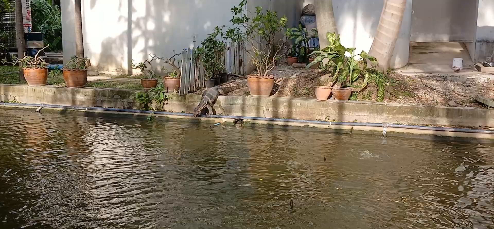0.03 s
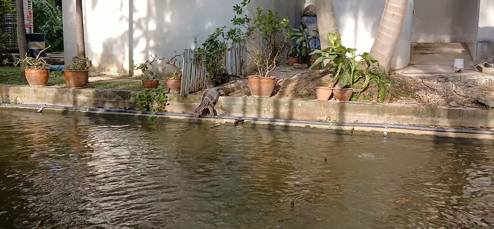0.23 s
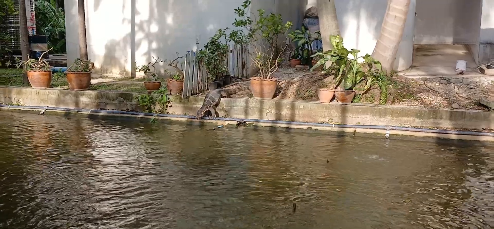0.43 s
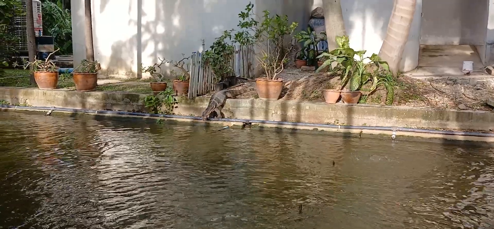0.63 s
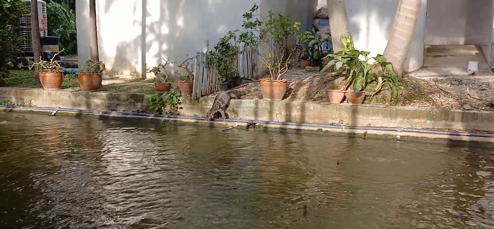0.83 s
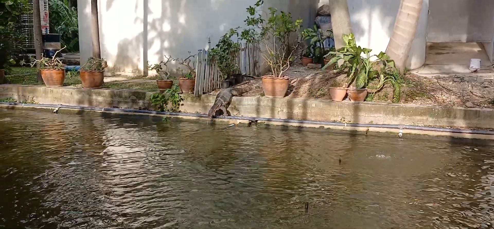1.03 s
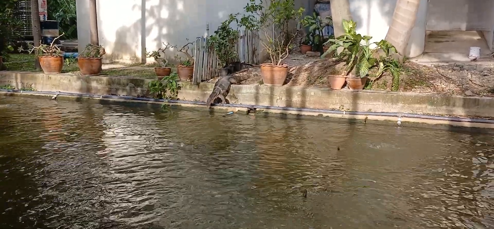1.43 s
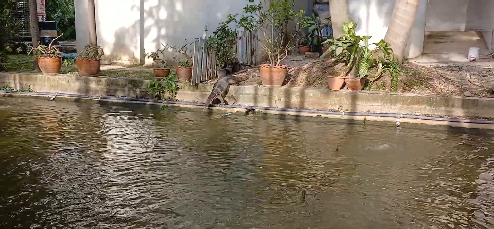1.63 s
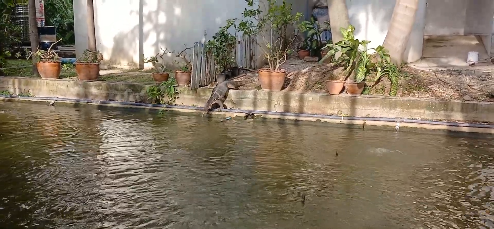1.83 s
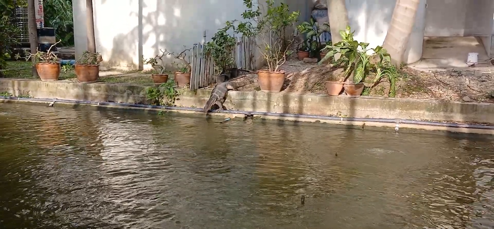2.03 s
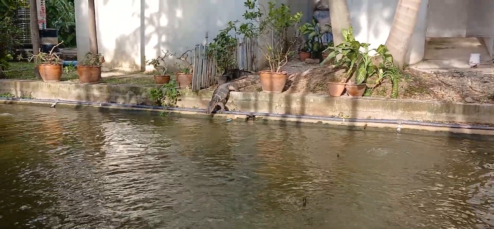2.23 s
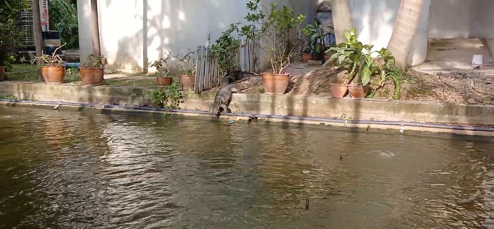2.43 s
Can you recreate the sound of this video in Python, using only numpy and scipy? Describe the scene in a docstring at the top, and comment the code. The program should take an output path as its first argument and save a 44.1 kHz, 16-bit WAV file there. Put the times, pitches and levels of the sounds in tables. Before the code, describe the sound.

Wind hits the microphone in low, uneven gusts with dull pops, then dies down. Far traffic and an airy hiss continue underneath, while faint birds whistle and small, quiet splashes come off an outdoor pond.

```python
"""Beside a park pond, on a small two-port microphone out in the wind.
Just after the start the sound cuts in with a soft bump, over far traffic and a steady airy hiss.
At once gusts rumble at each port on its own, and single eddies thump against one port or the other.
From about 0.4 s a few faint birds whistle in the background, echoed by walls and trees.
From about 0.8 s small splashes come off the pond; after two seconds the wind dies down."""
import sys
import numpy as np
from scipy import signal
from scipy.fft import rfft, irfft
from scipy.io import wavfile
from scipy.ndimage import uniform_filter1d

SR = 44100
rng = np.random.default_rng(int(sys.argv[2]) if len(sys.argv) > 2 else 0)


def file_out(sig):
    """Save sig as 16-bit WAV at sys.argv[1]."""
    # one column per channel
    cols = np.atleast_2d(sig).T
    # limit, then scale
    lim = np.clip(cols, -1, 1)
    pcm = np.round(lim * 32767).astype(np.int16)
    wavfile.write(sys.argv[1], SR, pcm)


N = 110250
T = np.arange(N) / SR
FREQS = np.maximum(np.arange(N // 2 + 1) * SR / N, 1)
START_S = 0.067


def from_db(db):
    """Decibels to gain."""
    return 10 ** (np.asarray(db) / 20)


def rms_one(x):
    """Scale to rms 1."""
    return x / np.sqrt(np.mean(x ** 2) + 1e-20)


def in_time(rows):
    """A curve of (seconds, value) rows at every sample."""
    return np.interp(T, *np.transpose(rows))


def butter(x, hz, kind, order=2):
    """Causal low-, high- or band-pass."""
    return signal.sosfilt(signal.butter(order, hz, kind, fs=SR, output="sos"), x + 1e-18)


def drift(rate_hz):
    """Random wander of rms 1, mostly slower than the rate."""
    return rms_one(irfft(rfft(rng.standard_normal(N)) / (1 + (FREQS / rate_hz) ** 2), N))


def coloured(spectrum):
    """Two unrelated noises with one spectrum, or with one for each side."""
    hz, *columns = np.transpose(spectrum)
    db = np.array([np.interp(np.log(FREQS), np.log(hz), c) for c in columns])
    skirts = np.minimum(FREQS / hz[0], 1) ** 2 * np.minimum(hz[-1] / FREQS, 1) ** 4
    return rms_one(irfft(rfft(rng.standard_normal((2, N))) * from_db(db) * skirts, N))


def panned(x, pan_db):
    """Share a sound between left and right at constant power."""
    gains = from_db(np.array([[.5], [-.5]]) * pan_db)
    return x * gains / np.sqrt(np.mean(gains ** 2, axis=0))


def opening_bump(level_db=-29.5, low_hz=209, top_hz=1130, spread_s=0.013):
    """A soft, dull bump on both sides as the sound cuts in."""
    puff = butter(rng.standard_normal((2, N)), [low_hz, top_hz], "band", order=3)
    puff = rms_one(butter(puff, low_hz, "low", order=1))
    swell = np.exp(-((T - START_S - spread_s) / spread_s) ** 2)
    return from_db(level_db) * puff * swell


# Traffic heard from far off. Each row: frequency in Hz, relative spectral level in dB.
TRAFFIC_SPECTRUM = [(25, -26), (60, -3.5), (95, -20), (128, 3), (180, -14), (270, -10), (400, -20.5),
                    (640, -18), (790, -22), (980, -21.5), (1350, -34), (2500, -37)]


def far_traffic(level_db=-35, lag_s=0.00029):
    """A far, even drone that reaches the left port a little earlier."""
    left = coloured(TRAFFIC_SPECTRUM)[0]
    right = np.interp(T - lag_s, T, left)
    return from_db(level_db) * rms_one(np.array([left, right]))


# The open air of the park. Each row: frequency in Hz, left and right relative spectral levels in dB.
HISS_SPECTRUM = [(463, 3, 4.5), (1120, -0.5, -6), (1470, 3.5, 0.5), (2240, 2, 2), (3050, -6.5, -3),
                 (4400, -14, -1.5), (5850, -11.5, -6.5), (7240, -14.5, -2.5), (8660, -11, -8.5),
                 (12000, -10, -9), (15800, -16.5, -14.5)]
# The slow course of that hiss. Each row: time in seconds, base level in dB.
HISS_LEVELS = [(0, -46), (.9, -50.5), (1.7, -49), (2.3, -48.5), (2.5, -50)]


def airy_hiss(treble_hz=7000, flicker_db=0.69):
    """Smooth hiss of the open air, brighter on the right; its top opens up in the first second."""
    air = coloured(HISS_SPECTRUM)
    treble = irfft(rfft(air) / (1 + (treble_hz / FREQS) ** 4), N)
    treble_db = np.interp(T, [.1, 1], [-4, 0])
    air = air - treble + treble * from_db(treble_db)
    return air * from_db(in_time(HISS_LEVELS) + flicker_db * drift(rate_hz=44))


# Gusts at the left and at the right port. Each row: time in seconds, relative rumble level in dB.
LEFT_GUSTS = [(0.07, -55), (0.19, -21.5), (0.28, -24), (0.36, -40), (0.43, -27), (0.48, -20.5),
              (0.51, -32.5), (0.54, -28), (0.61, -34.5), (0.85, -23.5), (0.95, -46), (1.19, -20),
              (1.22, -66), (1.27, -34.5), (1.45, -32.5), (1.52, -26.5), (1.59, -37.5), (1.63, -22.5),
              (1.71, -41), (1.8, -21.5), (1.92, -26.5), (2.08, -31), (2.13, -35.5), (2.31, -38),
              (2.39, -47), (2.5, -69)]
RIGHT_GUSTS = [(0.07, -36), (0.14, -23.5), (0.22, -21), (0.29, -30), (0.32, -24), (0.36, -28.5),
               (0.42, -21.5), (0.52, -26.5), (0.56, -20), (0.62, -31.5), (0.77, -27.5), (0.8, -31.5),
               (0.98, -26.5), (1.08, -47), (1.18, -34.5), (1.27, -23.5), (1.34, -43), (1.44, -28),
               (1.6, -47), (1.67, -26), (1.71, -45), (1.89, -33), (1.95, -37), (2.18, -37.5), (2.25, -35),
               (2.27, -49), (2.5, -41)]
# Wind right on a port. Each row: frequency in Hz, relative spectral level in dB.
RUMBLE_SPECTRUM = [(22, -54), (35, -16.5), (58, -3.5), (115, 1.5), (165, -3.5), (270, -12), (480, -25.5),
                   (800, -33), (1300, -49.5)]


def wind_rumble(gain_db=0.5, flutter_db=2, flutter_hz=27, steady_s=0.0297):
    """Turbulent pressure, separate at each port, follows the gusts and flutters within bounds."""
    gust_db = np.array([in_time(LEFT_GUSTS), in_time(RIGHT_GUSTS)])
    churn = coloured(RUMBLE_SPECTRUM)
    local_power = uniform_filter1d(churn ** 2, int(steady_s * SR), axis=1)
    churn = churn / np.sqrt(local_power + 1e-9)   # evened out, so the gusts set the level
    flutter = np.tanh([drift(flutter_hz), drift(flutter_hz)])
    return churn * from_db(gain_db + gust_db + flutter_db * flutter)


# Eddies striking the microphone itself. Each row: time in seconds, level in dB before the port rings,
# brightness in Hz, left minus right in dB.
EDDY_HITS = [(0.132, -10.5, 650, -32), (.148, -17.5, 525, -24), (0.174, -31, 222, -1),
             (.212, -18.5, 383, -9), (.246, -26.5, 610, -26), (0.27, -19.5, 180, 12),
             (.329, -8.5, 656, -35), (.340, -18.5, 460, -23), (0.372, -11, 622, -33),
             (0.391, -18, 525, -28), (0.411, -10, 556, -34), (0.428, -16.5, 750, 28), (.441, -10, 490, -6),
             (0.451, -20, 417, -14), (0.471, -16.5, 465, 12), (0.5, -20.5, 480, -29),
             (0.548, -17.5, 567, -34), (0.566, -16, 710, -31), (.585, -12.5, 500, -33),
             (.627, -17, 412, -24), (0.723, -20.5, 400, -28), (0.739, -20, 580, -32), (.768, -21, 230, 9),
             (.787, -21.5, 630, 31), (0.826, -27.5, 480, -29), (0.84, -17, 400, 15),
             (.875, -25.5, 403, -29), (0.948, -25.5, 420, -29), (0.991, -30, 496, -10),
             (1.142, -17, 655, 39), (1.16, -20, 390, 24), (1.254, -22.5, 494, -32),
             (1.267, -24.5, 418, -33), (1.35, -31.5, 420, 23), (1.404, -34, 416, 20),
             (1.513, -25.5, 454, 12), (1.798, -21, 540, 18), (1.809, -23.5, 215, 25),
             (1.840, -21.5, 430, 20), (1.891, -24, 716, 24), (1.922, -25.5, 447, 11), (2.057, -24, 296, 28)]


def wind_eddies(wake_s=0.0066, wake_share=0.37, low_share=0.37, floor_hz=120, level_span_s=0.00295):
    """Each eddy is one pressure pulse inside a short churn, rounded to a dull pop by the port."""
    pops = np.zeros((2, N))
    for s, db, hz, pan_db in EDDY_HITS:
        wake = rng.standard_normal(N) * np.exp(-((T - s) / wake_s) ** 2)
        push = wake_share * wake / np.sqrt(np.sum(wake ** 2))
        push[int((s - .5 / hz) * SR)] += .5 * rng.choice([-1, 1])   # the pulse pushes or pulls
        pop = butter(push, [low_share * hz, hz], "band", order=1)
        pop = butter(pop, hz, "low", order=4)
        pop = butter(pop, floor_hz, "high")
        pop *= np.sqrt(level_span_s * SR / np.sum(pop ** 2))   # the energy of rms 1 over that span
        pops += panned(pop * from_db(db), pan_db)
    return pops


def port_ring(pops, hz=1090, half_width=0.1, share=0.58):
    """The pops, plus the weak resonance they wake in the port."""
    band_hz = [hz * (1 - half_width), hz * (1 + half_width)]
    return pops + share * butter(pops, band_hz, "band", order=1)


# Faint birds behind the wind. Each row: start and length in seconds, first, middle and last pitch in Hz,
# level in dB, left minus right in dB, rasp as a share of the pitch.
BIRD_NOTES = [(0.416, .19, 5350, 5246, 4125, -55, -15, 0.01),
              (0.665, 0.036, 5350, 5150, 5230, -62, -5, .012),
              (0.809, 0.2, 3210, 3190, 2896, -59, 0, 0.056),
              (.925, .075, 2850, 2605, 2570, -52.5, 4, 0.012),
              (1.051, 0.15, 4740, 4480, 4280, -53.5, -16, 0.031),
              (1.094, 0.1, 4030, 3950, 3960, -60, -2, 0.026),
              (1.222, 0.12, 2750, 2570, 2543, -51, 4.5, 0.013),
              (1.675, 0.18, 3067, 3048, 3080, -56, 4, 0.0046),
              (1.809, 0.153, 3354, 3417, 3407, -51.5, -3, 0.026),
              (1.80, .17, 4704, 4500, 4470, -55.5, -15, 0.036),
              (1.873, 0.073, 6550, 6970, 6600, -59.5, -13, 0.036),
              (1.956, 0.17, 2356, 2317, 2440, -55.5, 3, .055)]


def birds(warble_hz=161.5, tremble_db=4, tremble_hz=160):
    """Whistles, clear or hoarse, that swell, glide through three pitches and fade."""
    out = np.zeros((2, N))
    for s, length, first_hz, middle_hz, last_hz, db, pan_db, rasp in BIRD_NOTES:
        along = np.clip((T - s) / length, 0, 1)
        glide_hz = np.interp(along, [0, .5, 1], [first_hz, middle_hz, last_hz])
        hz = glide_hz * (1 + rasp * drift(warble_hz))
        whistle = np.sin(2 * np.pi * np.cumsum(hz) / SR)
        swell = np.abs(np.sin(np.pi * along)) ** .5
        tremble = from_db(tremble_db * drift(tremble_hz))
        out += panned(from_db(db) * swell * tremble * whistle, pan_db)
    return out


def park_echoes(direct, t60_s=.8, echo_db=.5, build_s=0.0048):
    """The direct sound, plus diffuse echoes from walls and trees."""
    tail = rng.standard_normal((2, N)) * from_db(-60 * T / t60_s) * (1 - np.exp(-T / build_s))
    tail = tail / np.sqrt(np.sum(tail ** 2, axis=1, keepdims=True))
    return direct + from_db(echo_db) * signal.fftconvolve(direct, tail, axes=1)[:, :N]


# Small splashes out on the pond. Each row: start in seconds, level in dB before the envelope,
# pitch in Hz, left minus right in dB.
POND_SPLASHES = [(.785, -51, 7000, -4), (1.412, -44.5, 6500, 7), (1.572, -46, 9000, -9),
                 (1.72, -48.5, 1800, -2), (1.776, -49, 1780, 7), (1.91, -44, 4800, -11),
                 (2.282, -41.5, 970, 0), (2.30, -43, 1880, 14), (2.295, -48, 7500, -10)]


def splashes(width_octaves=0.36, rise_s=0.00095, decay_cycles=18):
    """Brief spatters of water, each round its own pitch; the high ones die fastest, as short ticks."""
    out = np.zeros((2, N))
    for s, db, hz, pan_db in POND_SPLASHES:
        band = 1 / (1 + (np.log2(FREQS / hz) / width_octaves) ** 2)
        spray = rms_one(irfft(rfft(rng.standard_normal(N)) * band, N))
        age = np.maximum(T - s, 0)
        envelope = (1 - np.exp(-age / rise_s)) * np.exp(-age * hz / decay_cycles)
        out += panned(from_db(db) * spray * envelope, pan_db)
    return out


def scene():
    """Wind right on the microphone, with the park behind it."""
    wind = wind_rumble() + port_ring(wind_eddies())
    return wind + opening_bump() + far_traffic() + airy_hiss() + park_echoes(birds()) + splashes()


def record(dry, rise_s=0.00071, cutoff_hz=15750):
    """The sound cuts in abruptly; the highest treble is cut off steeply."""
    opened = dry * np.clip((T - START_S) / rise_s, 0, 1)
    low_pass = signal.ellip(10, .05, 70, cutoff_hz, fs=SR, output="sos")
    return signal.sosfiltfilt(low_pass, opened)


dry = scene()
out = record(dry)
file_out(out)
```